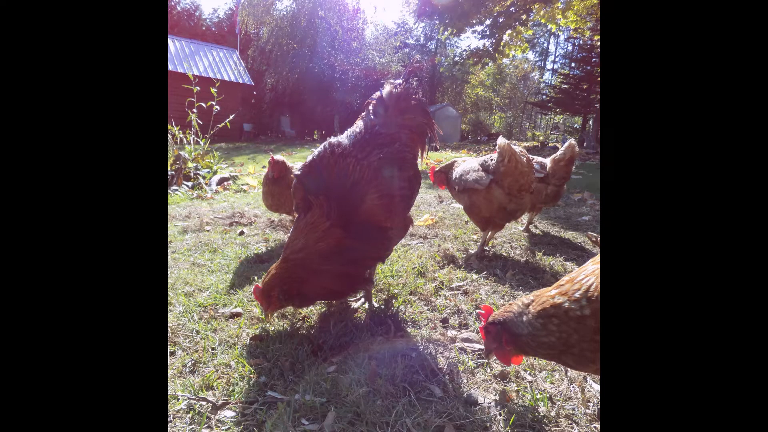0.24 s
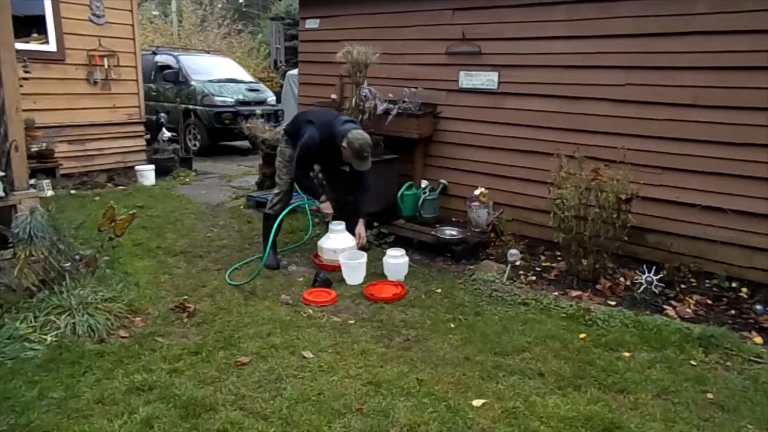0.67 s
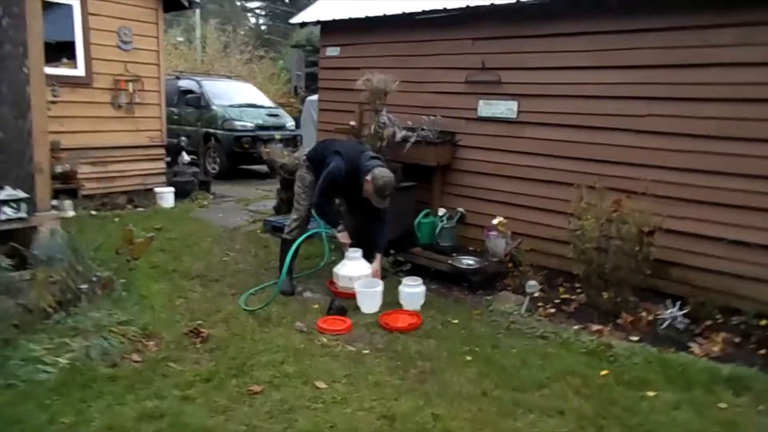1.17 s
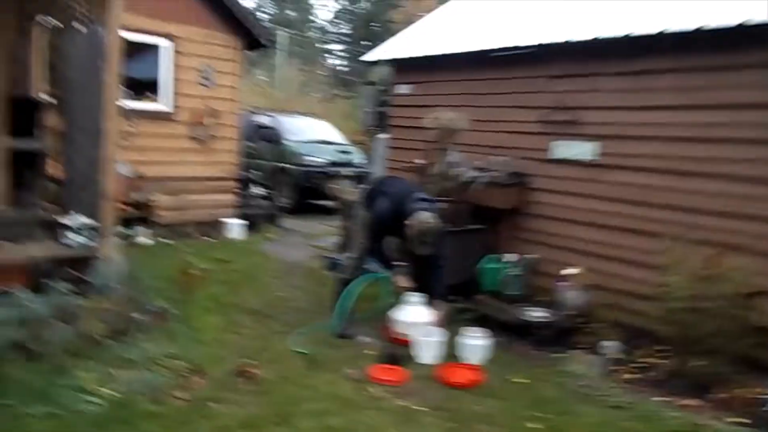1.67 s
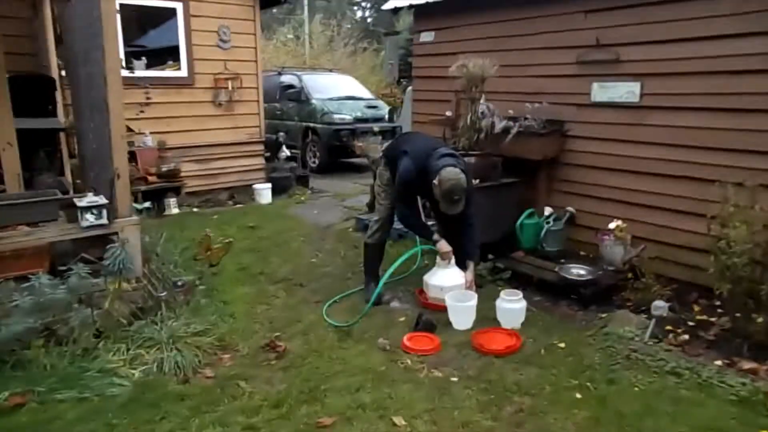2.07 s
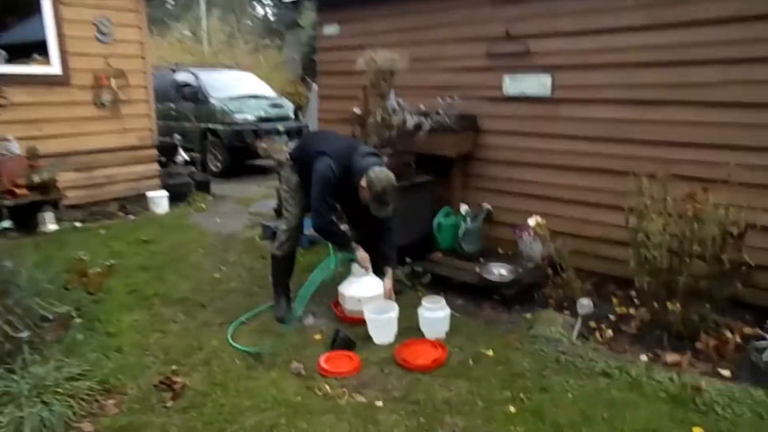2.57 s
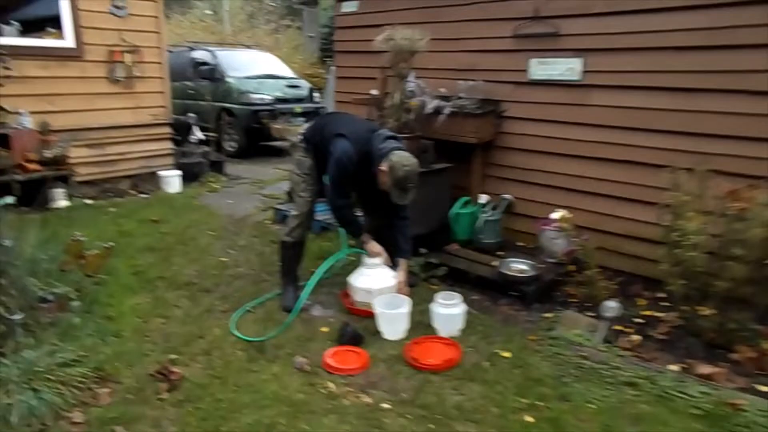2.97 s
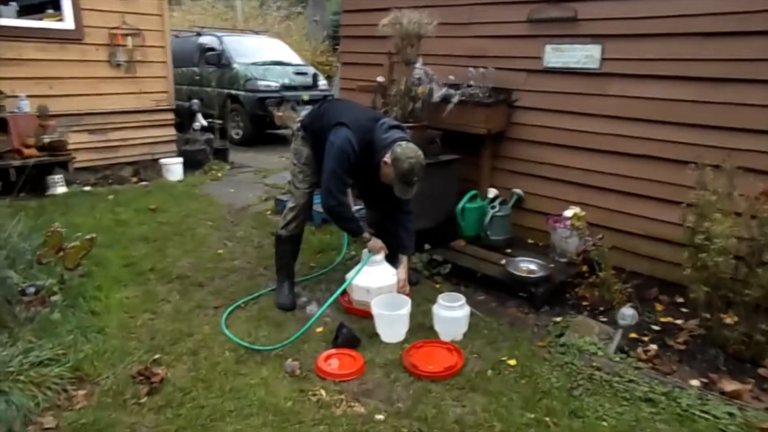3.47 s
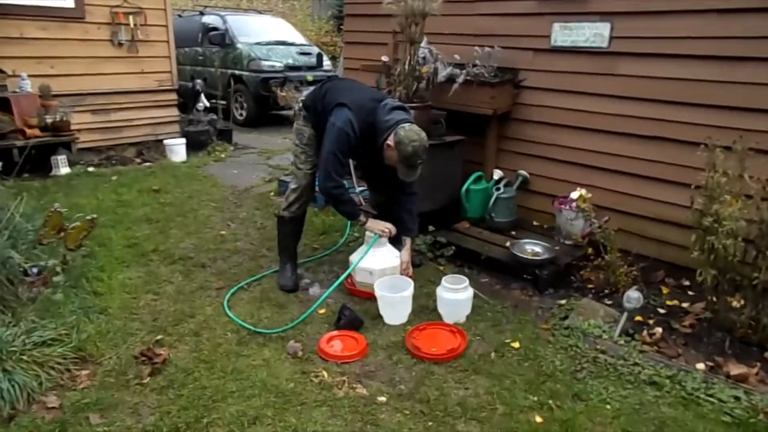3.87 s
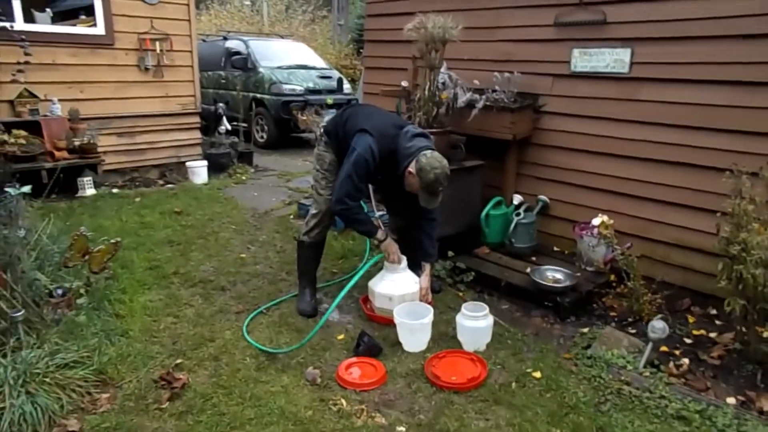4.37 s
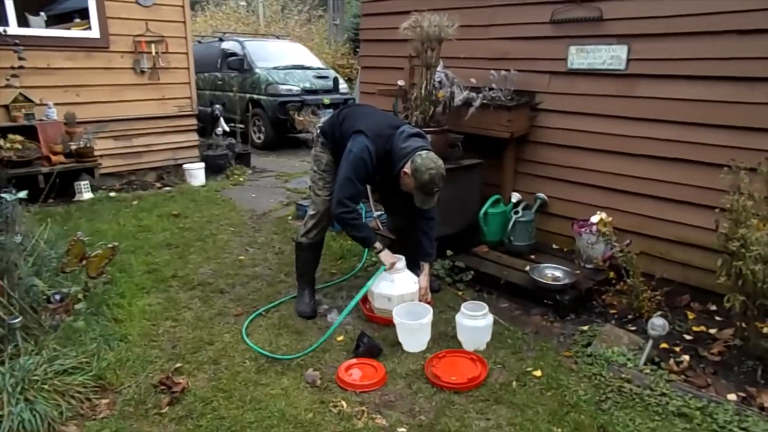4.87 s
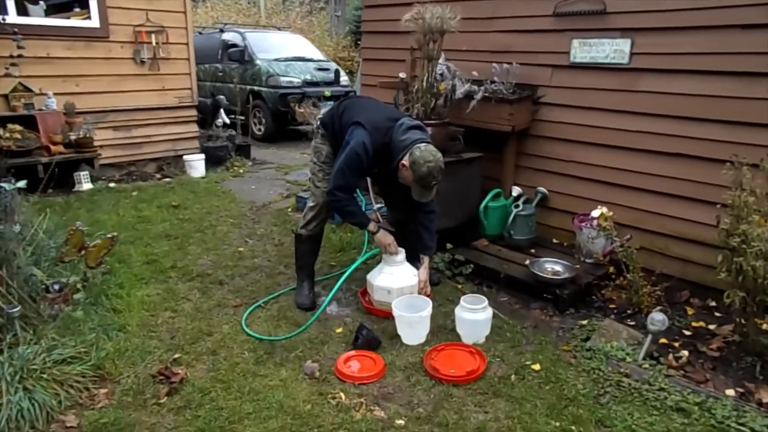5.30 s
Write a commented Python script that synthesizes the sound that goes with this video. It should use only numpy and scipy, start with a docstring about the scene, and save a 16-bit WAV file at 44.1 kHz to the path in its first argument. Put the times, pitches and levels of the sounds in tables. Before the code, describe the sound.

A garden hose runs steadily into a hollow plastic container outdoors, hissing and churning over a low airy boom, with bubble plinks and light plastic knocks.

```python
"""A garden hose fills a hollow plastic waterer on a lawn, heard through one microphone.
From silence the sound fades in within half a second: hissing, churning noise for the water, a low boom for
the air inside, a faint higher note that soon dies, and a far rumble. Short spurts of noise come at once,
bubbles plink as gliding sines from 0.9 s, the hose slaps as short pulses from 1.5 s, and from 1.7 s hand
and hose knock the plastic, whose ringing modes answer. Froth of many small bubbles swells most near 4.1 s."""
import sys
import numpy as np
from scipy import signal
from scipy.fft import next_fast_len
from scipy.io import wavfile
from scipy.ndimage import uniform_filter1d

SR = 44100
rng = np.random.default_rng(int(sys.argv[2]) if len(sys.argv) > 2 else 0)


def persist_wave(psi):
    """Save psi, clipped to +-1, as 16-bit WAV."""
    counts = np.round(np.clip(psi, -1, 1) * 32767).astype(np.int16)
    wavfile.write(sys.argv[1], SR, np.atleast_2d(counts).T)


N = 244314  # length in samples

# When the fade-in begins and ends, both in seconds.
FADE_IN_S = (0.4633, 0.5024)
# Colour of the churning water. Each row: pitch in Hz, relative strength in dB per Hz.
CHURN = [(90, -39), (130, -9), (250, -1.5), (350, -1), (575, -4.5), (880, -6.5), (1100, 0.5), (1600, -7.5),
         (3300, -10.5), (5000, -14), (8000, -18.5)]
# Colour of the spray hiss. Each row: pitch in Hz, relative strength in dB per Hz.
SPRAY = [(1500, -67), (2500, -9), (3550, -3), (5570, -6.5), (8000, -5.5), (11000, -3.5), (14500, -6),
         (18000, -4.5)]
# Neck resonance of the air, nearly empty and then fuller. Each row: pitch in Hz, width in Hz.
CAVITY = [(150, 46), (152, 13.8)]
# Steady rings in the churn. Each row: pitch in Hz, width in Hz, level in dB against the churn noise.
STANDING = [(584, 50, -16.5), (987, 60, -8), (1390, 290, -14.5), (1874, 36, -19), (2745, 61, -16)]
# Ringing modes of the plastic wall. Each row: pitch in Hz, strength in dB, time to fall by 60 dB in seconds.
WALL = [(178, -17.5, 0.25), (200, -15.5, 0.12), (320, -30.5, 0.17), (430, -17, 0.032), (592, -0.5, 0.049),
        (679, -10, 0.052), (721.5, 0.5, 0.036), (780, -8, 0.0092), (1000, -8, 0.037), (1130, -18.5, 0.054),
        (1270, -17, 0.014), (1620, -8.5, 0.0075), (1900, -11.5, 0.018), (2220, -12.5, 0.012),
        (3570, -18.5, 0.074)]
# Knocks on the wall. Each row: start in seconds, force in dB, crack in dB, extra for low modes in dB,
# extra for upper middle modes in dB, extra for high modes in dB, contact length in seconds.
KNOCKS = [(1.738, -38, -62, -2, 3, 17.5, 0.016), (3.227, -33, -48.5, -6, -12, -4, 0.0061),
          (3.233, -25.5, -55.5, -6, -4, -4, 0.0052), (3.255, -40, -53, -3, 0, 8, 0.005),
          (3.41, -47, -52, 2, -4, 16, 0.0067), (3.564, -36.5, -47, 4, 1, 10, 0.0088),
          (3.589, -38, -44, -18, -4, 18.5, 0.0022), (3.595, -31.5, -55, -13, 5.5, 0, 0.0059),
          (3.603, -40, -62, -5, -3, -3, 0.0071), (3.634, -36.5, -65, 7, 9, 13.5, 0.012),
          (3.645, -37, -75, -8, -5, 6, 0.0073), (3.656, -39.5, -71, -8, -8, 9.5, 0.0085),
          (3.698, -44, -49, -12, 3, 16, 0.017), (3.716, -47, -52, 0, 11, 3, 0.0073),
          (3.903, -47.5, -47, -23, -25, 25.5, 0.0044), (3.909, -30.5, -57, -11, -5, -11, 0.0095),
          (4.257, -29, -43, -5, -1, 1, 0.0063), (4.263, -28.5, -57, 1, 10.5, -11, 0.0044),
          (4.274, -35.5, -58, 2, 0, 2, 0.0027), (4.284, -44, -52, -1, -4, -1, 0.0033),
          (4.463, -38, -45.5, 1, 2.5, -5, 0.0063), (4.945, -35.5, -49, 4, 0, 8.5, 0.01),
          (4.951, -29.5, -47, -4, 1, 5, 0.018), (5.032, -45, -45.5, -2, -7, 19, 0.013),
          (5.352, -44.5, -56, 6, -2, 8, 0.0045), (5.431, -25.5, -37.5, 5.5, 4.5, 7.5, 0.0053),
          (5.442, -27, -57, -2, -2.5, -17, 0.0038), (5.45, -31, -63, 1, -11, 4, 0.0043)]
# Dry slaps of the hose. Each row: start in seconds, pulse peak in dB, centre in Hz,
# time for the noise to fall by 60 dB in seconds.
SLAPS = [(1.498, -34, 483, 0.065), (1.708, -49, 1500, .015), (1.7285, -28, 1180, 0.015),
         (1.729, -31, 3000, .012), (1.7305, -27.5, 1600, 0.026), (2.261, -31, 312, 0.024),
         (2.261, -27, 1000, 0.016), (3.039, -46, 400, 0.038), (4.046, -31, 2600, .012)]
# Clear bubbles. Each row: start in seconds, level of the sine in dB, starting pitch in Hz,
# time to fall by 60 dB in seconds, swell in seconds, glide in octaves per second.
PLINKS = [(.891, -45, 2800, .05, .002, 0), (.942, -36, 2720, 0.027, .002, -2),
          (1.008, -42, 2730, 0.036, .002, -4), (1.497, -31.5, 3930, 0.016, 0.0011, 0),
          (1.786, -43, 2500, 0.043, 0.0022, 2), (1.79, -44, 3500, .03, 0.0017, -3),
          (2.114, -43.5, 2030, 0.12, 0.0017, 3), (2.397, -43, 1900, .05, 0.0017, 2),
          (2.435, -45, 705, 0.083, 0.0078, 0), (2.468, -43, 1875, 0.06, 0.0048, 1),
          (2.538, -36.5, 772, 0.072, 0.0079, 0.5), (2.672, -38, 2620, .02, 0.0016, 3),
          (2.668, -32, 1000, 0.067, 0.016, -0.5), (2.765, -41.5, 2350, .06, 0.0046, 2),
          (2.887, -36, 3880, 0.029, .001, 8), (2.968, -43.5, 975, 0.15, .004, -0.5),
          (3.012, -43, 3000, .04, .004, 3), (4.010, -28.5, 3500, 0.027, 0.0011, 1.5),
          (4.015, -44, 3610, 0.68, 0.034, -4.5), (4.012, -43, 3900, 0.023, .002, 0),
          (4.046, -28.5, 3170, 0.013, 0.0011, 5), (4.067, -44, 3550, 0.02, 0.0014, 1),
          (4.078, -36, 3230, 0.027, 0.0017, -11), (4.085, -37, 2600, 0.02, 0.0033, -6),
          (4.105, -43, 2450, 0.09, .006, -5.5), (4.14, -39, 2090, 0.054, 0.0052, -2),
          (4.15, -41.5, 1130, 0.15, 0.0061, -1), (4.181, -40, 2050, .04, .003, -2),
          (4.184, -37.5, 2500, 0.025, 0.0068, -0.5), (4.25, -41, 4480, .04, 0.0026, -10),
          (5.524, -46, 1070, 0.05, 0.0044, -3)]
# Spurts of spray and froth. Each row: start in seconds, rms level before swell and decay in dB,
# centre in Hz, time to fall by 60 dB in seconds.
SPURTS = [(.544, -27, 8060, 0.044), (.888, -51, 5000, 0.2), (1.2, -36, 4750, 0.086),
          (1.56, -28.5, 2600, 0.04), (1.26, -40, 6840, 0.061), (2.11, -41.5, 2500, 0.13),
          (2.195, -41, 3200, 0.1), (2.41, -35, 4000, 0.078), (2.515, -45.5, 2300, 0.15),
          (2.755, -50, 2500, 0.1), (2.935, -37, 3400, 0.069), (3.085, -38, 3100, 0.074),
          (2.645, -39.5, 2720, 0.14), (2.875, -37, 3700, 0.16), (3.003, -41, 3270, 0.31),
          (3.26, -25, 7000, 0.032), (3.277, -24, 10100, 0.035), (3.441, -24, 6560, 0.029),
          (3.84, -31, 3570, 0.056), (4.065, -19.5, 10800, 0.033), (4.012, -47, 3420, 0.11),
          (4.075, -42, 2670, 0.096), (4.125, -52, 2300, 0.26), (4.178, -35, 2360, 0.091),
          (4.51, -43, 6200, 0.23), (4.756, -23, 7400, 0.03)]
# Surges of the air in the vessel. Each row: time in seconds, level in dB.
BOOM = [(0.5, -51), (0.68, -43.5), (0.7, -46.5), (0.82, -45.5), (0.85, -48.5), (0.92, -38.5), (0.96, -55),
        (0.99, -48), (1.06, -54), (1.12, -43), (1.22, -54), (1.24, -39.5), (1.33, -58), (1.35, -48),
        (1.69, -59), (2.04, -45.5), (2.34, -64.5), (2.37, -52.5), (2.48, -65), (2.59, -52.5), (2.7, -59),
        (3.0, -63), (3.01, -69), (3.05, -52.5), (3.15, -70), (3.25, -68), (3.35, -70), (3.41, -62),
        (3.48, -72), (3.6, -54), (3.76, -62), (3.81, -52.5), (4.01, -65), (4.04, -57), (4.23, -52),
        (4.36, -63), (4.47, -49), (4.7, -52.5), (4.73, -45.5), (4.84, -52.5), (4.88, -54), (4.98, -40),
        (5.05, -51), (5.33, -76), (5.36, -47), (5.4, -62), (5.44, -43), (5.54, -64)]
# Colour of the far rumble. Each row: pitch in Hz, relative strength in dB per Hz.
RUMBLE = [(20, -20), (45, -3), (70, -3.5), (110, 4.5), (160, -18)]
# The jet over time. Each row: time in seconds, churn level in dB, spray hiss level in dB.
FLOW = [(.5, -48.5, -47), (.9, -46.5, -48.5), (1.2, -47, -53.5), (1.7, -47, -51.5), (2.2, -48, -49.5),
        (3.0, -49.5, -48.5), (3.5, -50.5, -51), (3.9, -51.5, -49), (4.3, -46, -47.5), (4.6, -53, -47.5),
        (4.95, -47.5, -49), (5.15, -51.5, -53), (5.54, -50, -54.5)]
# The jet drumming on the wall. Each row: time in seconds, level in dB.
DRUMMING = [(.5, -69), (1.5, -56.5), (2.3, -60), (2.7, -57.5), (3.1, -56.5), (4.4, -59.5), (4.52, -48.5),
            (4.7, -53.5), (4.95, -58), (5.2, -68), (5.54, -69)]
# Froth of small bubbles. Each row: time in seconds, level in dB.
FROTH = [(.5, -57), (1.0, -55), (1.5, -93), (2.3, -83), (2.42, -53.5), (2.58, -56), (2.67, -61),
         (2.75, -49), (2.89, -58), (2.97, -77), (3.03, -59), (3.3, -60), (3.98, -53), (4.05, -46),
         (4.15, -46), (4.25, -57.5), (4.55, -51.5), (4.7, -57.5), (5.54, -66)]
# Far rumble over time. Each row: time in seconds, level in dB.
RUMBLE_DB = [(.5, -67), (2.7, -70), (5.54, -69)]

BOOM_FLICKER_DB, BOOM_FLICKER_PER_S = 1.5, 8.0
# A higher note of the empty vessel, dying as it fills; its level holds at the end of the fade-in.
OVERTONE_HZ, OVERTONE_WIDTH_HZ, OVERTONE_DB, OVERTONE_FADE_DB_PER_S = 312, 29, -52, 29
NOZZLE_HZ, NOZZLE_WIDTH_HZ, NOZZLE_DB = 8000, 280, -20.5  # a faint colour in the hiss
TRICKLE_DB = -8.5  # fine droplets, against the spray
SLAP_NOISE_DB = -3  # against the slap's pulse level
FIRM_S = 0.0081  # longer contacts scuff more than they strike
YARD_T60_S, YARD_DB = 0.17, -18
CUTOFF_HZ = 15800


def from_db(db):
    """Turns decibels into a gain."""
    return 10 ** (np.asarray(db) / 20)


def rms_one(x):
    """Scales a sound to an rms of 1."""
    return x / np.sqrt(np.mean(x ** 2) + 1e-20)


def drift(rate_hz):
    """Flicker: noise twice through a one-pole low-pass, its long swells taken out; spread about 1."""
    r = np.exp(-80 * np.pi * rate_hz / SR)  # one step here lasts 40 samples
    slow = signal.lfilter([1], [1, -2 * r, r * r], rng.standard_normal(N // 40 + 2002))
    slow = (slow - uniform_filter1d(slow, size=300))[2000:]
    return np.interp(np.arange(N) / 40, np.arange(len(slow)), rms_one(slow))


def in_time(rows):
    """Columns of a curve, joined by straight lines in dB, as gains."""
    s, *columns = np.transpose(rows)
    return [from_db(np.interp(np.arange(N) / SR, s, column)) for column in columns]


def ring(clicks, hz, t60):
    """A unit click sets a sine of starting height 1 ringing; it falls by 60 dB in t60 seconds."""
    r, w = from_db(-60 / (t60 * SR)), 2 * np.pi * hz / SR
    return signal.lfilter([0, np.sin(w)], [1, -2 * r * np.cos(w), r * r], clicks + 1e-18)


def resonance(x, hz, width_hz):
    """A band-pass with a gain of about 1 at its top."""
    r = np.exp(-np.pi * width_hz / SR)
    top = np.array([1, 0, -1]) * (1 - r * r) / 2
    return signal.lfilter(top, [1, -2 * r * np.cos(2 * np.pi * hz / SR), r * r], x)


def butter_filter(x, order, hz, kind):
    """A smooth filter: "band" keeps what lies between two pitches, "high" what lies above one."""
    return signal.sosfilt(signal.butter(order, hz, kind, fs=SR, output="sos"), x)


def add(out, s, sound):
    """Mixes a short sound in from time s."""
    i = round(s * SR)
    out[i:i + len(sound)] += sound[:N - i]


def banded_noise(spectrum, patchy_db, shared):
    """Third-octave bands of noise, each flickering partly alone and partly with the rest; rms 1."""
    hz, level_db = np.transpose(spectrum)
    edges = 2 ** np.arange(np.log2(hz[0]), np.log2(hz[-1]) + .1, 1 / 3)
    out, together = 0, drift(16)
    white = rng.standard_normal((2, N))  # neighbouring bands take different noise
    for k, (low, high) in enumerate(zip(edges, edges[1:])):
        band = butter_filter(white[k % 2], 2, [low, high], "band")
        centre_db = np.interp(np.log(low * high) / 2, np.log(hz), level_db)
        flicker_db = patchy_db * (shared * together + drift(31.0))
        out = out + band * from_db(centre_db + flicker_db)
    return rms_one(out)


def bubbles(per_s, low_hz, high_hz, cycles, spread_db=4.0):
    """Small bubbles burst at random in clumps, swell briefly and ring for some cycles; rms 1."""
    sizes = from_db(spread_db * np.minimum(rng.exponential(1, N), 4)) * rng.choice([-1, 1], N)
    born = rng.random(N) < per_s * from_db(3 * drift(10)) / SR
    pitches, dealt = np.geomspace(low_hz, high_hz, 20), rng.integers(0, 20, N)
    out = 0
    for k, hz in enumerate(pitches):
        rung = ring(sizes * born * (dealt == k), hz, cycles / hz)
        out = out + resonance(rung, hz, 2.5 * hz / cycles)  # softens each start
    return rms_one(out)


def churn():
    """Turbulent water: flickering noise with steady standing rings and a swarm of bubbles."""
    noise = banded_noise(CHURN, patchy_db=2.5, shared=0.73)
    for hz, width_hz, level_db in STANDING:
        noise = noise + from_db(level_db) * rms_one(resonance(rng.standard_normal(N), hz, width_hz))
    swarm = bubbles(200, low_hz=460, high_hz=2037, cycles=36)
    return rms_one(noise + from_db(-8.0) * swarm)


def spray():
    """Spray is hissing noise with a faint colour of its own and many fine ringing droplets."""
    hiss = banded_noise(SPRAY, patchy_db=1.25, shared=1.2)
    hiss = hiss + from_db(NOZZLE_DB) * rms_one(resonance(hiss, NOZZLE_HZ, NOZZLE_WIDTH_HZ))
    return hiss + from_db(TRICKLE_DB) * bubbles(1500, low_hz=2500, high_hz=13280, cycles=50)


def wall(force, gains_db):
    """Every wall mode rings under the force with its own share; the wall gives off little bass."""
    modes = 0
    for (hz, level_db, t60), gain_db in zip(WALL, gains_db):
        modes = modes + from_db(level_db + gain_db) * ring(force, hz, t60)
    modes = butter_filter(modes, 1, 350, "high")
    return butter_filter(modes, 4, 150, "high")


def drumming():
    """Water drums on the wall: dull noise rings mostly the middle modes, each flickering; rms 1."""
    force = signal.lfilter([.1], [1, -.9], rng.standard_normal(N))
    gains_db = [1.6 * drift(7.3) - 12 * abs(np.log2(hz / 650)) for hz, *rest in WALL]
    return rms_one(wall(force, gains_db))


def froth():
    """Froth is a dense crowd of small, high bubbles that each ring for many cycles."""
    return bubbles(900, low_hz=1900, high_hz=4317, cycles=90, spread_db=3.5)


def boom():
    """Air sings on its neck resonance, slightly higher and purer as water rises; its swing is evened out."""
    drive = rng.standard_normal(N)
    broad, pure = [rms_one(resonance(resonance(drive, hz, width_hz), hz, 3 * width_hz))
                   for hz, width_hz in CAVITY]
    filled = np.interp(np.arange(N) / SR, [1.5, 4.3], [.1, .9])
    x = (1 - filled) * broad + filled * pure
    swing = np.abs(signal.hilbert(x, next_fast_len(N))[:N])
    x = x / (swing + 0.17) ** 0.63
    return rms_one(butter_filter(x, 4, [118, 215], "band"))


def boom_level():
    """The loudness of the air follows its table of surges, a little unsteadily."""
    gain, = in_time(BOOM)
    return gain * from_db(BOOM_FLICKER_DB * drift(BOOM_FLICKER_PER_S))


def overtone():
    """A higher note of the air: noise through a narrow resonance, dying at a steady rate in dB."""
    t = np.arange(N) / SR
    note = rms_one(resonance(rng.standard_normal(N), OVERTONE_HZ, OVERTONE_WIDTH_HZ))
    return from_db(OVERTONE_DB - OVERTONE_FADE_DB_PER_S * (t - FADE_IN_S[1])) * note


def rumble():
    """Far rumble is low, flickering noise whose level drifts slowly."""
    gain, = in_time(RUMBLE_DB)
    return gain * banded_noise(RUMBLE, patchy_db=-5.5, shared=0.73)


def bursts(events, octaves, swell_s):
    """Noise that swells quickly and dies, in a band around its centre: spurts, or the noise of slaps."""
    out, t = np.zeros(N), np.arange(6000) / SR
    for s, level_db, hz, t60 in events:
        edges = np.clip(hz * 2.0 ** (octaves * np.array([-.5, .5])), 50, 20000)
        noise = rms_one(butter_filter(rng.standard_normal(len(t)), 2, edges, "band"))
        shape = from_db(level_db - 60 * t / t60) * np.minimum(t / swell_s, 1) ** 2
        add(out, s, shape * noise)
    return out


def plinks():
    """A bubble is a sine that swells, glides and dies; splashing around it roughens it."""
    out, t = np.zeros(N), np.arange(8000) / SR
    for s, peak_db, hz, t60, swell_s, glide in PLINKS:
        phase = 2 * np.pi * np.cumsum(hz * 2.0 ** (glide * np.minimum(t, t60))) / SR
        splash = rms_one(resonance(rng.standard_normal(len(t)), hz, 0.23 * hz))
        swell = np.minimum(t / max(swell_s, 1 / SR), 1) ** 2
        decay = from_db(peak_db - 60 * np.maximum(t - swell_s, 0) / t60)
        fade_out = np.minimum((t[-1] - t) / 0.036, 1)
        add(out, s, decay * swell * fade_out * (np.sin(phase) + 0.19 * splash))
    return out


def slaps():
    """A dry slap is one broad pulse with a little noise."""
    pulses = np.zeros(N)
    for s, peak_db, hz, t60 in SLAPS:
        pulse = butter_filter(signal.unit_impulse(2000), 2, [hz / 1.6, hz * 1.6], "band")
        add(pulses, s, from_db(peak_db) * pulse / np.abs(pulse).max())
    return pulses + from_db(SLAP_NOISE_DB) * bursts(SLAPS, octaves=1.02, swell_s=0.0035)


def knocks():
    """A contact is a firm touch and a rattle; where it lands sets the share of low and high modes."""
    out, crack, t = np.zeros(N), np.zeros(N), np.arange(12000) / SR
    octaves = np.log2(np.array(WALL)[:, 0] / 650)
    for s, force_db, crack_db, low_db, middle_db, high_db, contact_s in KNOCKS:
        touches = rng.standard_normal(len(t)) * t * np.exp(-(t / contact_s) ** 2)
        touches = touches / np.sqrt(np.sum(touches ** 2))
        touches[0] = min(FIRM_S / contact_s, 1) ** 2  # the firm touch
        force = signal.lfilter([.2], [1, -.8], touches)
        shares_db = np.interp(octaves, [0.1, 0.11, 0.2, 0.35, 0.83],
                              [low_db, 0, middle_db, middle_db, high_db])
        shares_db = shares_db + rng.standard_normal(len(WALL))  # no two knocks land quite alike
        add(out, s, from_db(force_db) * wall(force, shares_db))
        snap = from_db(-60 * t / 0.027) + 1.68 * from_db(-60 * t / 0.17)  # a snap and a longer tail
        add(crack, s, from_db(crack_db) * snap * rng.standard_normal(len(t)))
    return out + butter_filter(crack, 1, [1500, 7000], "band")


def yard(x):
    """Ground, walls and shrubs scatter a short dull tail: the sound is smeared with fading noise."""
    t = np.arange(round(.35 * SR)) / SR
    dull = signal.lfilter([.4], [1, -.6], rng.standard_normal(len(t)))
    tail = dull * from_db(-60 * t / YARD_T60_S) * (t > .006)
    return x + from_db(YARD_DB) * signal.fftconvolve(x, tail / np.sqrt(np.sum(tail ** 2)))[:N]


def scene():
    """All sources meet in one microphone, the same on both channels."""
    churn_gain, spray_gain = in_time(FLOW)
    wall_gain, froth_gain = in_time(DRUMMING) + in_time(FROTH)
    jet = churn_gain * churn() + spray_gain * spray()
    jet = jet + wall_gain * drumming() + froth_gain * froth()
    air = boom_level() * boom() + overtone()
    hits = bursts(SPURTS, octaves=1.0, swell_s=0.011) + plinks() + slaps() + knocks()
    fade_in = np.interp(np.arange(N) / SR, FADE_IN_S, [0, 1]) ** 2
    mono = (jet + air + rumble() + yard(hits)) * fade_in
    return np.array([mono, mono])


def record(dry):
    """The top of the treble is cut steeply."""
    return signal.sosfilt(signal.ellip(12, .3, 65, CUTOFF_HZ, fs=SR, output="sos"), dry)


dry = scene()
out = record(dry)
persist_wave(out)
```